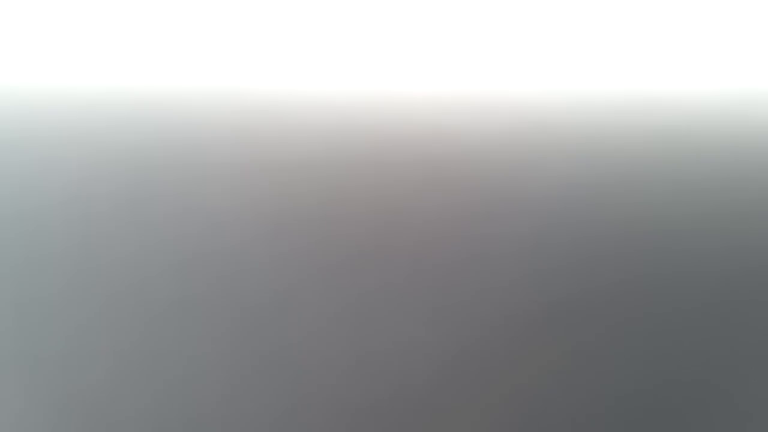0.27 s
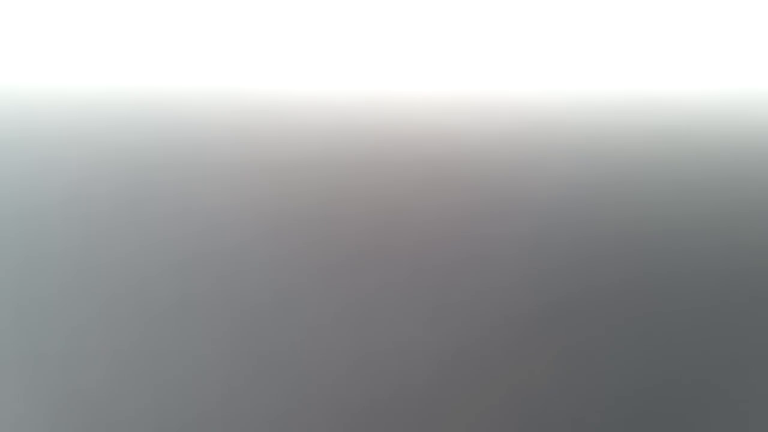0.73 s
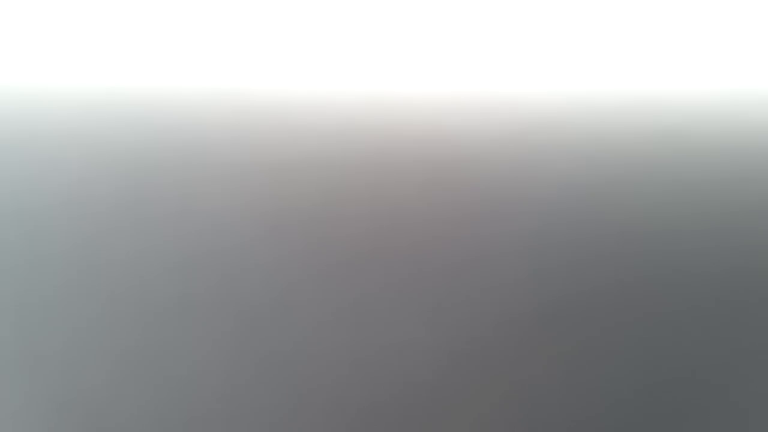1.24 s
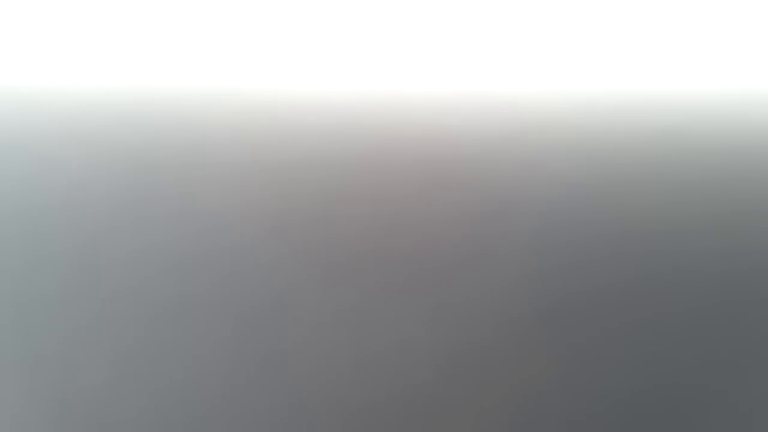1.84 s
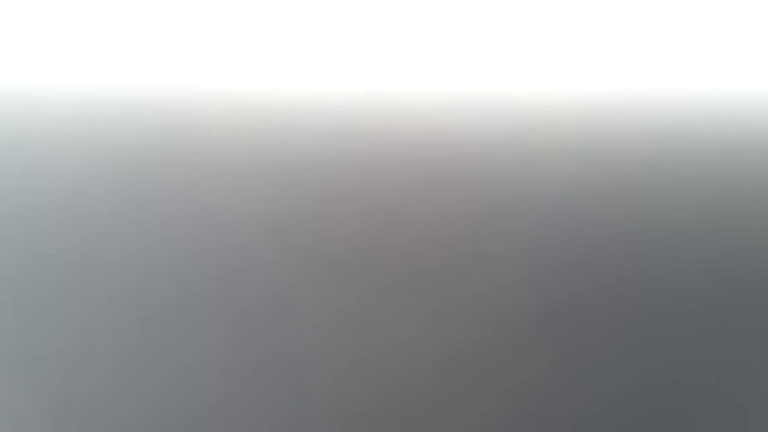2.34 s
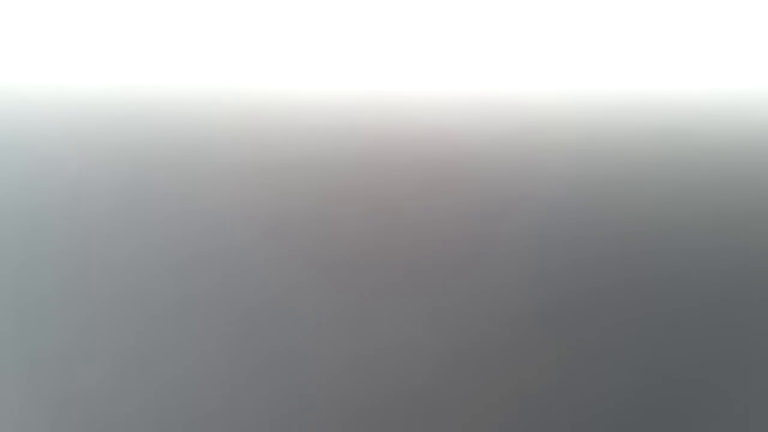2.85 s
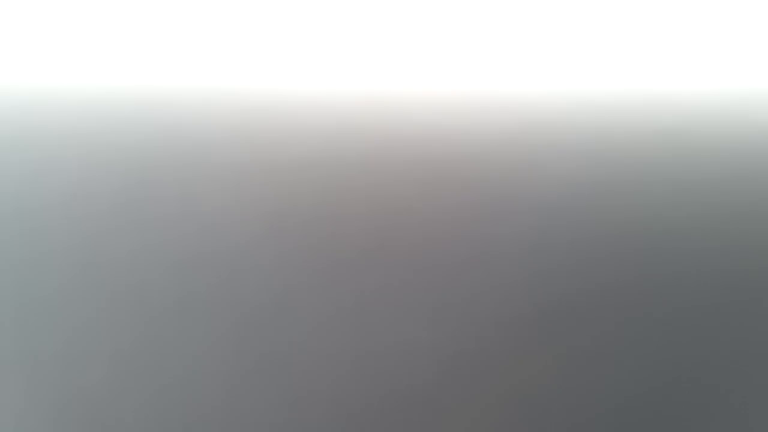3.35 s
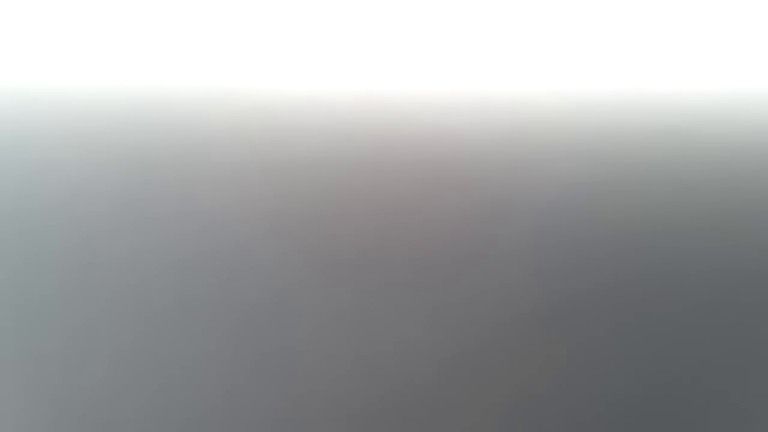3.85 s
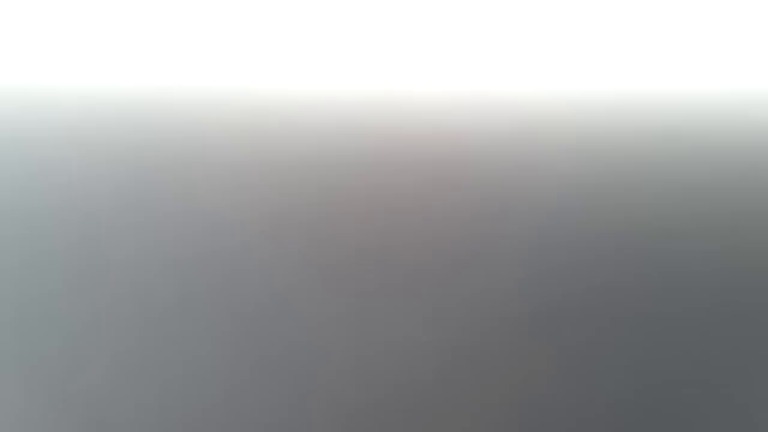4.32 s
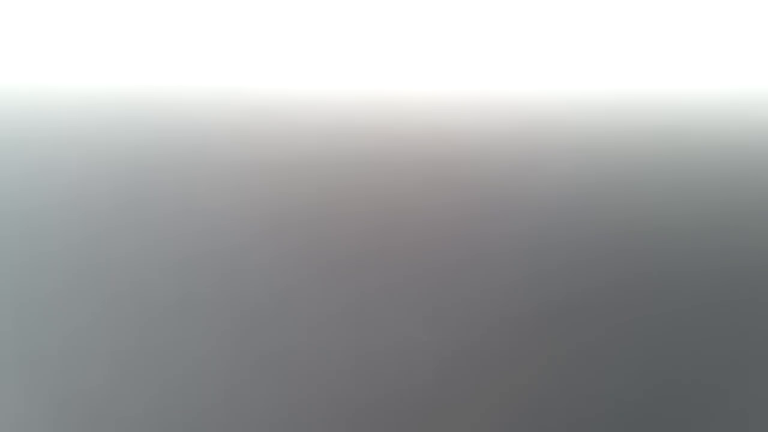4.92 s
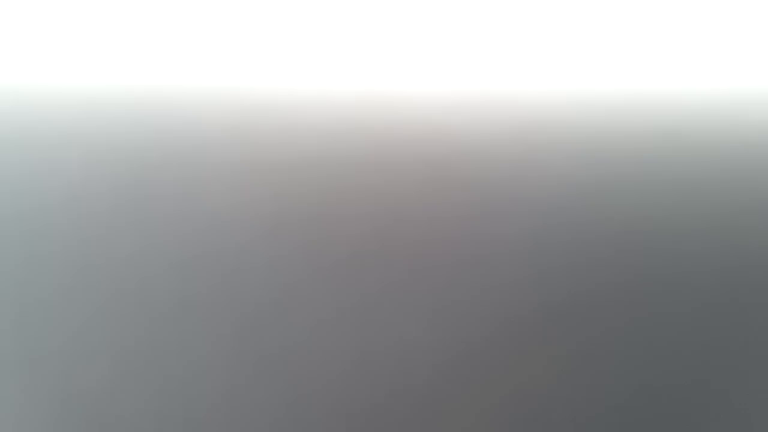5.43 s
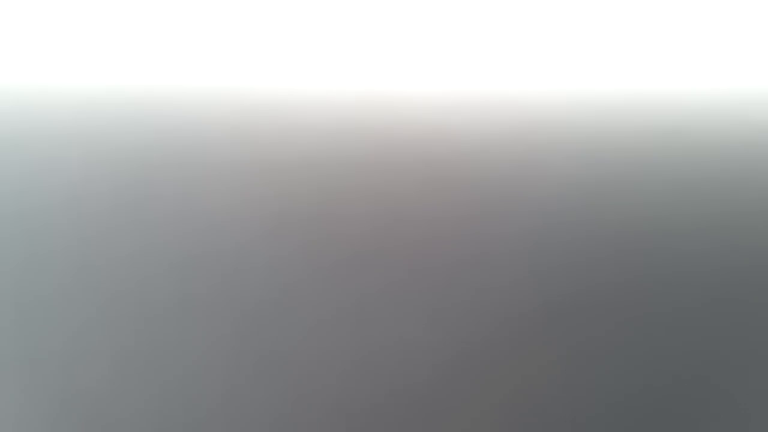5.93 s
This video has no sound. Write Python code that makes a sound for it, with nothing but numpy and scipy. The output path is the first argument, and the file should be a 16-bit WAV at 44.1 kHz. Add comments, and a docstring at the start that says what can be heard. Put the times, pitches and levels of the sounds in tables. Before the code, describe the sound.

Outdoors, close to a car, a four-cylinder engine idles fast, with booming exhaust, valve clatter and a light whine. From the start, a loose gearbox part clacks rapidly and grinds against its metal casing, stopping at about 1.3 seconds. The idle continues until 2.3 seconds, when the engine is switched off and chugs to rest in about a second, with a brief rubbery groan. Air hisses into the intake with a high, fluttering whistle; the whistle ends near 3.3 seconds and the hiss fades soon after. Two faint rising squeaks come between 3.3 and 3.6 seconds. At 3.8 seconds a heavy door knocks shut with a short rattle and small latch clicks. A faint, thin electric tone lingers over distant outdoor noise. Two more clicks land at 5.3 and 5.4 seconds amid a soft hollow rush, and far traffic swells gently until the end, around 6 seconds.

```python
"""Outdoors, by a car: a four-cylinder engine idles fast, exhaust puffs booming in the pipe over valve
clatter, while a loose gearbox part clacks once a turn and grinds against the casing. The grinding stops;
the engine is switched off and chugs to rest as air hisses and whistles into the intake.
An actuator squeaks and sings, a heavy door panel knocks shut and small latch clicks follow,
over a far wash of outdoor noise."""
import sys
import numpy as np
from scipy import signal
from scipy.fft import rfft, irfft, next_fast_len
from scipy.io import wavfile

SR = 44100
rng = np.random.default_rng(int(sys.argv[2]) if len(sys.argv) > 2 else 0)


def file_out(sig):
    """Save sig as 16-bit WAV at sys.argv[1]."""
    # one column per channel
    cols = np.atleast_2d(sig).T
    # limit, then scale
    lim = np.clip(cols, -1, 1)
    pcm = np.round(lim * 32767).astype(np.int16)
    wavfile.write(sys.argv[1], SR, pcm)


N = 272538
TIME = np.arange(N) / SR
IDLE_STROKES_PER_S, KEY_OFF_S = 43.79, 2.28
# gearbox casing modes: f/Hz, width/Hz, gain/dB
CASING = [(345, 30, -6), (485, 35, -4), (572, 55, 0), (1052, 45, -1), (1187, 40, -3), (1366, 40, -5),
          (1652, 70, -2), (2060, 110, -3), (2290, 70, -8), (3035, 55, -7), (3295, 60, -1), (4260, 120, -6),
          (4770, 100, -8), (5000, 120, -7), (5290, 60, -7)]


def from_db(db):
    """Decibels to gain."""
    return 10 ** (np.asarray(db) / 20)


def rms_one(x):
    """Scale to unit power."""
    return x / np.sqrt(np.mean(x ** 2) + 1e-20)


def curve(rows, at_s=TIME):
    """Interpolate (t/s, value) rows."""
    return np.interp(at_s, *np.transpose(rows))


def since(start_s):
    """Seconds since start_s, zero before."""
    return np.maximum(TIME - start_s, 0)


def burst(start_s, rise_s, decay_s):
    """Contact envelope: quick rise, exponential fall."""
    age_s = since(start_s)
    return (1 - np.exp(-np.minimum(age_s / rise_s, 20))) * np.exp(-np.minimum(age_s / decay_s, 20))


def gate(start_s, length_s, fade_s):
    """Trapezoid envelope, fades within its length."""
    return np.clip(np.minimum(TIME - start_s, start_s + length_s - TIME) / fade_s, 0, 1)


def swell(start_s, length_s):
    """Half-sine envelope."""
    return np.sin(np.pi * np.clip((TIME - start_s) / length_s, 0, 1))


def glide(start_s, length_s, hz, hz_per_s):
    """Linear pitch slide."""
    return hz + hz_per_s * np.minimum(since(start_s), length_s)


def sine(hz):
    """Tone along a pitch curve; rms 1."""
    return np.sqrt(2) * np.sin(2 * np.pi * (np.cumsum(hz) / SR + rng.random()))


def white():
    """White noise; rms 1."""
    return rng.standard_normal(N)


def drift(knots_per_s):
    """Smooth random wander; rms 1."""
    knots = rng.standard_normal(4096)
    return rms_one(np.interp(TIME * knots_per_s, np.arange(len(knots)), knots))


def grains(per_s, spread_db):
    """Tiny random contacts of uneven size; rms 1."""
    hits = (rng.random(N) < per_s / SR) * rng.choice([-1, 1], N)
    return rms_one(hits * from_db(spread_db * np.clip(white(), -2, 2)))


def contact(cutoff_hz):
    """Dense tiny contacts, low-passed at cutoff_hz; rms 1."""
    lowpass = signal.butter(1, cutoff_hz, fs=SR, output="sos")
    return rms_one(signal.sosfilt(lowpass, grains(6000, 0.49)))


def colour(x, spectrum):
    """Minimum-phase filter from (f/Hz, gain/dB) rows, scaled so white noise keeps its power."""
    size = next_fast_len(N + SR // 2, real=True)
    hz, db = np.transpose(spectrum)
    log_hz = np.log(np.fft.rfftfreq(size, 1 / SR) + 1)
    gain = rms_one(from_db(np.interp(log_hz, np.log(hz), db)))
    cepstrum = irfft(np.log(gain), size)
    cepstrum[1:size // 2] *= 2
    cepstrum[size // 2 + 1:] = 0
    return irfft(rfft(x, size) * np.exp(rfft(cepstrum)), size)[:N]


def resonate(x, hz, width_hz):
    """One resonance, peak gain 1."""
    radius = np.exp(-np.pi * width_hz / SR)
    feedforward = np.array([1, 0, -1]) * (1 - radius ** 2) / 2
    feedback = [1, -2 * radius * np.cos(2 * np.pi * hz / SR), radius ** 2]
    return signal.lfilter(feedforward, feedback, x + 1e-18)


def body(x, modes):
    """Resonances in parallel."""
    return sum(from_db(db) * resonate(x, hz, width_hz) for hz, width_hz, db in modes)


def crankshaft(friction_strokes_per_s2=22.0, drag_s=1.5):
    """Strokes per second: steady idle; after key-off, dry friction and oil drag stop the engine."""
    offset = friction_strokes_per_s2 * drag_s
    return np.maximum((IDLE_STROKES_PER_S + offset) * np.exp(-since(KEY_OFF_S) / drag_s) - offset, 0)


def exhaust(speed, strokes, creep_db_per_s=0.56, build_s=0.044, stall_speed=0.24, hot_share=0.47):
    """Each stroke rings the pipe: a hot boom at idle, separate chugs of cooler air while coasting."""
    # pipe mode in hot gas and in cool air: f/Hz, width/Hz, gain/dB
    hot_pipe = [(122.4, 37.7, -2)]
    cool_pipe = [(117, 62, 0)]
    puffs = np.diff(np.floor(strokes), prepend=-1) * from_db(1.24 * drift(45))
    fired = puffs * (TIME < KEY_OFF_S) * from_db(45.5 + creep_db_per_s * TIME)
    pumping = (1 - np.exp(-(since(KEY_OFF_S) / build_s) ** 2)) * (speed > stall_speed)
    pumped = puffs * pumping * from_db(44) * speed ** 1.4
    rocking = resonate(resonate(pumped, hz=62, width_hz=22), hz=62, width_hz=22)  # block on its mounts
    boom = fired + hot_share * pumped  # some hot gas stays in the pipe
    chugs = (1 - hot_share) * pumped
    for chamber in range(3):
        boom, chugs = body(boom, hot_pipe), body(chugs, cool_pipe)
    return boom + chugs + from_db(-17) * rocking


def valves(speed, strokes, turn_depth_db=0.5, unfired_drop_db=1.4):
    """Valve clatter pulses with the strokes, rings the casing and fades with speed."""
    # clatter spectrum: f/Hz, gain/dB
    spectrum = [(120, -52), (200, -24.5), (291, -3), (320, -6), (418, 0.5), (481, -2), (521, -4), (783, -8),
                (1050, -3), (2100, -5.5), (2880, -15.5), (3420, -11.5), (4680, -16.5), (6820, -13.5),
                (8500, -19.5), (11000, -67), (18700, -120)]
    stroke_depth_db = 2.0 - 0.5 * (1 - speed)
    pulse_db = stroke_depth_db * np.cos(2 * np.pi * (strokes + 0.56))
    pulse_db += turn_depth_db * np.cos(np.pi * (strokes + 0.32))
    level = from_db(-23.5 - unfired_drop_db * (TIME > KEY_OFF_S) + pulse_db) * speed ** 1.5
    clatter = colour(level * grains(5000, 4.0), spectrum)
    # slack drive parts ring a cover while coasting
    slack = np.sqrt(np.clip(1 - speed, 0, 1))
    cover = from_db(3) * slack * resonate(clatter, hz=2060, width_hz=170)
    return 0.67 * clatter + 0.58 * body(clatter, CASING) + cover


def whine(speed, waver=0.0032, trim_db=-0.25):
    """Engine and belt-driven parts whine; pitch follows speed, level falls steeply with it."""
    # partials: multiple of stroke rate, level before trim/dB
    partials = [(3.72, -39), (5, -51), (6, -46), (7.44, -33.5), (8, -45.5), (8.96, -38.5), (10.77, -36),
                (11.14, -36.5), (12.43, -59), (14.86, -41), (17.02, -46), (24.0, -58.5)]
    tones = 0
    for multiple, db in partials:
        level = from_db(db + trim_db + 2 * drift(22.1))
        tones += level * sine(multiple * IDLE_STROKES_PER_S * speed * (1 + waver * drift(24.9)))
    return tones * speed ** 10


def gearbox(first_s=0.0332, settle_s=1.25, uneven_db=1.1, fall_db_per_s=117):
    """A loose part strikes the casing once a turn and grinds between blows until it settles."""
    # blow force curve, stray blows, grinding curve: t/s, relative level/dB
    blow_force = [(.03, -5), (.3, -2), (.44, -3), (.49, 0.5), (.6, -6.5), (.72, -1.5), (.765, -10),
                  (.81, -24), (.87, 6.5), (.945, -10), (.99, -2), (1.175, 0), (1.225, -3)]
    strays = [(.002, -4), (0.285, -2.5), (1.291, -5), (1.342, -7.5)]
    grind_level = [(.1, -14), (.6, -18.5), (.73, -15), (1.08, -17), (1.22, -16)]
    # clack and grinding spectra: f/Hz, gain/dB
    clack_spectrum = [(100, -31.5), (300, -12), (700, 2.5), (1200, 4), (2200, 0), (2800, 0.5), (3400, -2.5),
                      (4000, -6.5), (5500, -6), (7500, -13.5), (8500, -20.5)]
    grind_spectrum = [(150, -57.5), (250, -33), (321, -7), (432, -13.5), (580, -3.5), (692, -4),
                      (1030, -3.5), (1700, -5.5), (1890, -6.5), (2090, -3.5), (2770, -10.5), (5150, -18.5),
                      (7330, -23), (8500, -32), (11000, -66.5), (18700, -120)]
    turns_s = np.arange(first_s, settle_s, 2 / IDLE_STROKES_PER_S)  # two strokes a turn
    turns_db = curve(blow_force, turns_s) + uneven_db * rng.standard_normal(len(turns_s))
    blows = np.vstack([np.column_stack([turns_s, turns_db]), strays])
    blows_s, blows_db = blows.T
    # only hard blows crack; all scatter into fine contacts
    cracks = np.bincount((blows_s * SR).astype(int), from_db(2 * blows_db + 13), N)
    scatter = sum(from_db(db - 4.2) * burst(s - 0.001, 0.00063, decay_s=0.0081) for s, db in blows)
    chatter = 0.67 + 0.57 * sum(burst(s, 0.0017, decay_s=0.045) for s in blows_s)
    grind = from_db(curve(grind_level) - fall_db_per_s * since(settle_s)) * chatter * grains(3500, 2.8)
    clacks = cracks + scatter * grains(16000, 0.95)
    force = colour(clacks, clack_spectrum) + colour(grind, grind_spectrum)
    return 0.66 * force + body(force, CASING)


def door(thud_hz=190, rattle_hz=4500, shiver_hz=1600, rattle_lag_s=0.0067):
    """The panel strikes and rebounds, each time a dull thud then a bright rattle; its trim shivers on."""
    # blows: t/s, relative thud level/dB, relative rattle level/dB
    knocks = [(3.824, -13, -6.5), (3.871, -15, -18), (3.919, -17, -27)]
    # force spectrum: f/Hz, gain/dB
    spectrum = [(50, -32), (110, -11.5), (500, 1.5), (1500, 0.5), (1850, -5), (2600, -8), (2800, -16),
                (3400, -12.5), (3900, -27.5), (8000, -28)]
    # panel modes: f/Hz, width/Hz, gain/dB
    modes = [(109, 12, -1), (162, 14, -3), (228, 30, 0), (461, 18, -2), (503, 20, 4.5), (670, 50, 0),
             (900, 25, -2), (1144, 22, 2), (1224, 22, -3), (1424, 32, 1), (1523, 28, 0), (1986, 35, -5),
             (2584, 35, -6), (3128, 35, -7)]
    thuds = sum(from_db(db) * burst(s - 0.001, 0.00065, decay_s=0.023) for s, db, _ in knocks)
    rattles = sum(from_db(db) * burst(s + rattle_lag_s, 0.002, decay_s=0.017) for s, _, db in knocks)
    shiver = from_db(-29.5) * gate(start_s=3.94, length_s=0.105, fade_s=0.016)
    contacts = thuds * contact(thud_hz) + rattles * contact(rattle_hz) + shiver * contact(shiver_hz)
    force = 0.42 * colour(contacts, spectrum)
    return 0.59 * force + body(force, modes)


def latch():
    """Small crunchy clicks: a bright tick plus a hollow body."""
    # clicks: t/s, level/dB, relative body level/dB, decay/s
    clicks = [(3.819, -35.5, -12, 0.021), (3.968, -41, -3, 0.015), (4.04, -34, -3, 0.014),
              (5.3, -42, 10, .02), (5.444, -28.5, 5.5, 0.022)]
    # tick and body spectra: f/Hz, gain/dB
    tick_spectrum = [(2000, -2.5), (3300, 1), (4500, -6), (5300, 1), (7500, -3), (8500, -7)]
    body_spectrum = [(300, -11), (600, 3), (750, 7), (1100, 5.5), (1600, -8), (2500, -5.5), (3500, -21.5)]
    ticks = sum(from_db(db) * burst(s, 0.002, decay_s) for s, db, _, decay_s in clicks)
    hollow = sum(from_db(db + body_db) * burst(s, 0.001, decay_s) for s, db, body_db, decay_s in clicks)
    return colour(ticks * grains(7200, 1.6), tick_spectrum) + colour(0.94 * hollow * white(), body_spectrum)


def mounts(strokes, throb_db=4, roughness=0.0337):
    """Rubber mounts groan as the engine rocks, sagging in pitch and throbbing with the strokes."""
    # groans: t/s, length/s, f/Hz, level/dB
    groans = [(2.345, .085, 384, -25), (2.421, .135, 457, -35)]
    sound = 0
    for s, length_s, hz, db in groans:
        pitch_hz = glide(s, length_s, hz, hz_per_s=-480) * (1 + roughness * drift(90))
        sound += from_db(db) * swell(s, length_s) * sine(pitch_hz)
    return sound * from_db(throb_db * np.cos(2 * np.pi * strokes))


def throttle_whistle(hz=6930, width_hz=400, rise_s=0.022, decay_s=0.037, flutter_db=2.5):
    """Air whistles through the throttle gap in fluttering spells."""
    # spells: t/s, length/s, level/dB
    spells = [(2.433, 0.43, -39.5), (2.923, 0.25, -44.5), (3.18, 0.036, -40.5)]
    whistle = rms_one(resonate(resonate(white(), hz, width_hz), hz, width_hz))
    level = sum(from_db(db) * np.minimum(since(s) / rise_s, 1) * np.exp(-since(s + length_s) / decay_s)
                for s, length_s, db in spells)
    return level * from_db(flutter_db * drift(40)) * whistle


def intake_hiss(start_s=2.41, rise_s=0.072, hold_end_s=3.39, sag_db_per_s=6.5, fall_db_per_s=27):
    """The manifold vacuum fills past the shut throttle: a hiss that sags, then dies."""
    # hiss spectrum: f/Hz, gain/dB
    spectrum = [(2500, -9), (3300, -2.5), (4500, -11), (5500, 1), (7500, -9.5), (8500, -5)]
    flow_db = -37.5 - sag_db_per_s * since(start_s) - fall_db_per_s * since(hold_end_s)
    return from_db(flow_db) * np.minimum(since(start_s) / rise_s, 1) * colour(white(), spectrum)


def actuator(drive_hz=2001, roughness=0.0472):
    """A small actuator gives faint rising squeaks; its drive sings on as a thin electric tone."""
    # squeaks: t/s, length/s, f/Hz, level/dB
    squeaks = [(3.278, 0.32, 1640, -47), (3.477, 0.11, 2050, -42)]
    sound = 0
    for s, length_s, hz, db in squeaks:
        pitch_hz = glide(s, length_s, hz, hz_per_s=550) * (1 + roughness * drift(900))
        level = from_db(db + 2 * drift(71)) * swell(s, length_s)
        sound += level * (sine(pitch_hz) + from_db(-15) * sine(2 * pitch_hz))
    tone_hz = drive_hz * (1 + 0.0024 * drift(80))
    tone_level = from_db(-53.5) * gate(start_s=3.7, length_s=2.5, fade_s=0.34)
    return sound + tone_level * (sine(tone_hz) + from_db(-13) * sine(2 * tone_hz))


def outdoors(trim_db=0.3):
    """An even far wash, one soft hollow rush and a swell of far traffic rumble."""
    # wash curve: t/s, level before trim/dB
    wash_level = [(3.6, -35.5), (4.2, -38), (5.4, -36.5), (6.18, -37.5)]
    # wash, rush and traffic spectra: f/Hz, gain/dB
    wash_spectrum = [(18, -45), (30, -19), (75, -8), (229, -7), (342, -10), (511, -7), (575, -4), (711, -7),
                     (859, -4.5), (1280, -4), (1870, -12), (2060, -11.5), (2870, -26), (7200, -28),
                     (8500, -34.5), (11000, -79), (18700, -120)]
    rush_spectrum = [(300, -25.5), (600, 0), (950, 3.5), (1250, 0), (1600, 2), (2600, -11.5), (4000, -25),
                     (7500, -23), (8500, -45)]
    traffic_spectrum = [(40, -18), (80, -8), (130, -5), (250, 0), (450, -3.5), (700, -6.5), (1500, -12),
                        (3000, -38)]
    wash = from_db(curve(wash_level) + trim_db) * colour(white(), wash_spectrum)
    rush = from_db(-36.5) * gate(start_s=5.06, length_s=0.7, fade_s=0.17) * colour(white(), rush_spectrum)
    hollow = from_db(-3) * resonate(rush, hz=900, width_hz=130)
    traffic = from_db(-42) * swell(start_s=5.33, length_s=1.2) * colour(white(), traffic_spectrum)
    return wash + rush + hollow + traffic


def scene():
    """Mono mix; the crankshaft drives exhaust, valves, whine and the throb of the mounts."""
    strokes_per_s = crankshaft()
    speed = strokes_per_s / IDLE_STROKES_PER_S  # 1 at idle
    strokes = np.cumsum(strokes_per_s) / SR
    engine = exhaust(speed, strokes) + valves(speed, strokes) + whine(speed) + mounts(strokes)
    car = engine + gearbox() + throttle_whistle() + intake_hiss() + actuator()
    return (car + door() + latch() + outdoors())[None]


def record(dry, ceiling=0.68, mic_low_hz=35, mic_top_hz=8300, cutoff_hz=15800):
    """A narrow-band microphone rounds the peaks; any overshoot is cut flat, then low-passed."""
    rounded = dry / (1 + (dry / ceiling) ** 6) ** (1 / 6)
    rounded = signal.sosfilt(signal.butter(2, mic_low_hz, "high", fs=SR, output="sos"), rounded)
    microphone = signal.firwin(121, mic_top_hz, window=("kaiser", 7), fs=SR)
    limited = np.clip(signal.fftconvolve(rounded, microphone[None], mode="same"), -ceiling, ceiling)
    return signal.sosfilt(signal.ellip(10, 0.1, 80, cutoff_hz, fs=SR, output="sos"), limited)


dry = scene()
out = record(dry)
file_out(out)
```